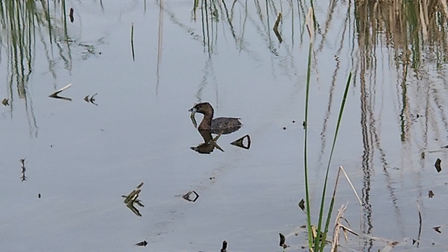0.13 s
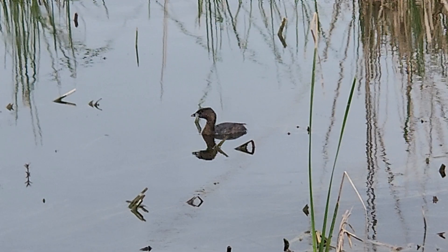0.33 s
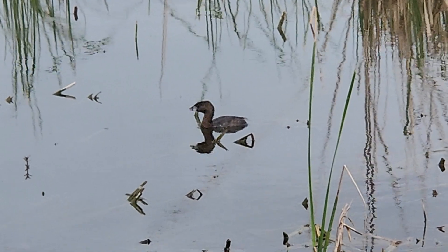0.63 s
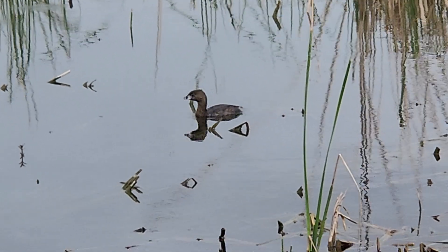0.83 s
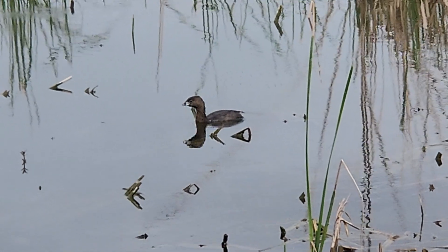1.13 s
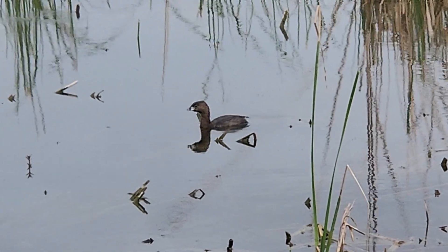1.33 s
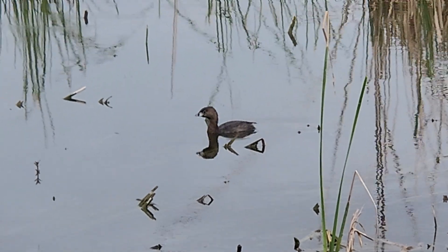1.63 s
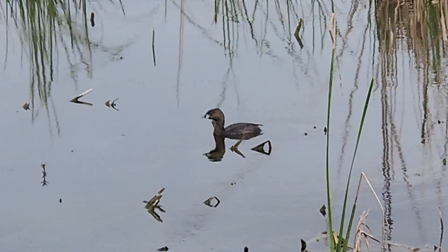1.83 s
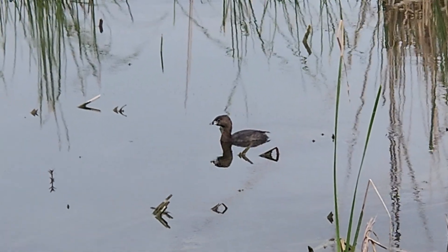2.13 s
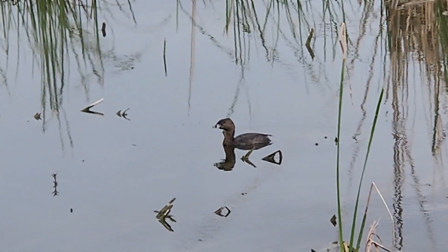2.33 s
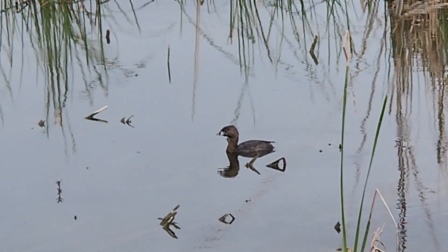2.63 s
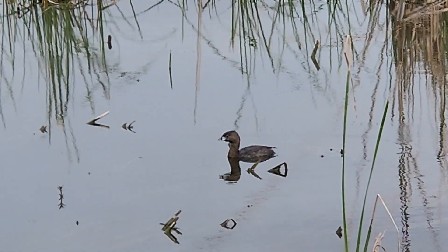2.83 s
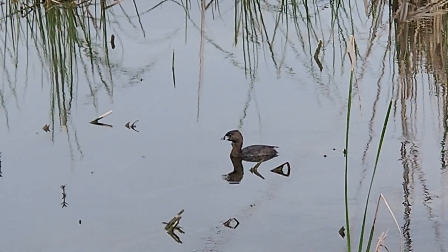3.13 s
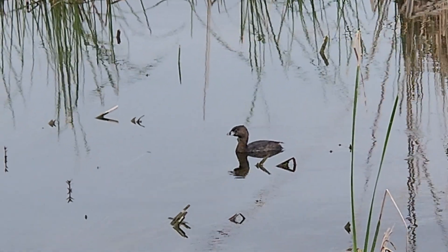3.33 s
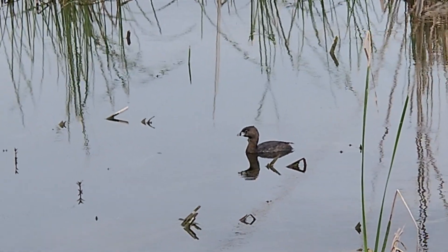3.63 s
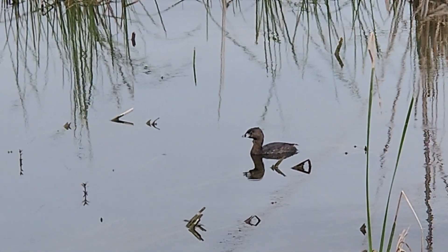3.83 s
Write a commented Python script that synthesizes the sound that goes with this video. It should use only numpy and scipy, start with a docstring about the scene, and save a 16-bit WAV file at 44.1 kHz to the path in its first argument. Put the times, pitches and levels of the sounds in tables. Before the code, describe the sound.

Faint, distant birds chirp over a calm lake's soft hush and uneven low rumble. After a tiny silence, wind buffets the microphone, strongest left, until about 0.3 s, fading by 0.6. A rough nasal waterbird call cracks upward and falls at 0.6-0.75. Repeated thin notes follow from 1.1 to 1.8, quick twittering at 2.1-2.9, a dry clicking rattle at 2.9-3.05, then sparse chirps and a wind thump near 3.7.

```python
"""A calm, reedy lake. Small birds chirp far off, a waterbird gives one nasal, falling call, and reeds rattle dryly.
Wind buffets the microphone at the start and near the end, over a low rumble and a soft outdoor hush.
Wind, rumble, hush, faint bands of hiss and knocks are filtered noise; eddies are short swings of pressure.
The birds are gliding sine tones, the waterbird's with harmonics and hissing air. The rattle is a train
of ringing clicks with crackle. Birds and rattle also get a short, scattered echo tail."""
import sys
import numpy as np
from scipy import signal
from scipy.fft import rfft, irfft
from scipy.io import wavfile
from scipy.ndimage import uniform_filter1d

SR = 44100
rng = np.random.default_rng(int(sys.argv[2]) if len(sys.argv) > 2 else 0)


def transcribe(signal):
    """Save signal, clipped to [-1, 1], as a 16-bit WAV file at the path in sys.argv[1]."""
    frames = np.atleast_2d(signal).T
    limited = np.clip(frames, -1, 1)
    pcm = np.round(limited * 32767).astype(np.int16)
    wavfile.write(sys.argv[1], SR, pcm)


N = 176400
TIME = np.arange(N) / SR  # seconds
FREQ = np.maximum(np.arange(N // 2 + 1) * SR / N, 1)  # Hz
LEFT_RIGHT = np.array([[1], [-1]])  # added to the left, taken from the right


def from_db(db):
    """Turn decibels into a gain."""
    return 10 ** (np.asarray(db) / 20)


def rms_one(x):
    """Scale to an average strength (rms) of 1."""
    return x / np.sqrt(np.mean(x ** 2) + 1e-20)


def in_time(rows):
    """Join a table's points with straight lines; give each column at every sample."""
    times, *columns = np.transpose(rows)
    return [np.interp(TIME, times, column) for column in columns]


def at_hz(points):
    """Read a frequency table at every frequency, evenly spaced in octaves between its points."""
    hz, value = np.transpose(points)
    return np.interp(np.log(FREQ), np.log(np.maximum(hz, 1)), value)


def noise(gain):
    """Random noise with the given gain at each frequency, scaled to rms 1."""
    return rms_one(irfft(rfft(rng.standard_normal(N)) * gain, N))


def bell(hz, octaves):
    """A bell-shaped band of frequencies, with its width in octaves."""
    return np.exp(-0.5 * (np.log2(FREQ / hz) / octaves) ** 2)


def drift(rate_hz):
    """A random wander of rms 1, mostly slower than the given rate."""
    return noise(1 / (1 + (FREQ / rate_hz) ** 2))


def pan(db):
    """Left and right gains, left minus right in dB, that keep the total power constant."""
    return rms_one(from_db(db * LEFT_RIGHT / 2))


def across_lake(x, pan_db, wet_db):
    """The direct sound plus a spread-out tail, scattered by reeds and banks."""
    t60_s, delay_s = 0.59, 0.015  # time for the tail to sink 60 dB; wait before it starts
    t = TIME[:SR]
    tails = rng.standard_normal((2, SR)) * from_db(-60 * t / t60_s) * (t > delay_s)
    wet = np.array([signal.fftconvolve(x, tail / np.linalg.norm(tail))[:N] for tail in tails])
    return pan(pan_db) * (x + from_db(wet_db) * wet)


def wind(curve):
    """Turbulence on one microphone port: stronger gusts shed brighter, lumpier eddies."""
    # colour of a strong gust: (frequency [Hz], level per Hz [dB])
    gust_colour = [(15, -28), (40, -9), (78, 5), (120, -4.5), (170, -8), (255, -7), (330, -25), (500, -33),
                   (700, -33), (1000, -46), (1600, -68.5), (4000, -88.5)]
    strong_db, knee_hz = -16, 189
    dulling = 0.64  # dB lost above the knee for each dB below a strong gust
    eddy_db = 5.5  # random spread of the level above the knee

    level_db, = in_time(curve)
    air = noise(from_db(at_hz(gust_colour)))
    # even out the noise's own swings in strength
    air = air / np.sqrt(uniform_filter1d(air ** 2, size=1500) + 0.056)
    body = irfft(rfft(air) / (1 + (FREQ / knee_hz) ** 4), N)
    weakness_db = np.minimum(level_db - strong_db, 0)
    eddies = (air - body) * from_db(dulling * weakness_db + eddy_db * drift(38))
    return from_db(level_db) * (body + eddies)


def rumble():
    """A low, uneven rumble of noise, nearly alike on both sides."""
    # loudness over time: (time [s], level [dB])
    loudness = [(.07, -37.5), (.6, -61.5), (.73, -55), (.94, -49.5), (.99, -61), (1.25, -53), (1.65, -53.5),
                (1.83, -58), (1.92, -48), (1.99, -61.5), (2.24, -59), (2.31, -46.5), (2.44, -55.5),
                (2.56, -47.5), (2.65, -51), (2.95, -49.5), (3.03, -57.5), (3.3, -63), (4, -78)]
    # colour: (frequency [Hz], level per Hz [dB])
    colour = [(15, -30), (35, -5), (70, 4.5), (110, -6), (160, -7.5), (250, -17.5), (400, -23), (800, -60)]
    side_db = -26  # the part that differs between left and right

    level_db, = in_time(loudness)
    shape = from_db(at_hz(colour))
    middle = noise(shape)
    side = from_db(side_db) * noise(shape) * LEFT_RIGHT
    return from_db(level_db) * (middle + side)


def hush():
    """Distant outdoor noise: mostly shared in the bass, spread out in the treble."""
    # colour: (frequency [Hz], level per Hz [dB])
    colour = [(120, -25.5), (200, -0.5), (263, -9), (298, -6.5), (352, -10.5), (371, -15), (446, -11),
              (554, -20.5), (630, -17.5), (742, -10.5), (827, -15.5), (957, -16.5), (1170, -26.5),
              (1380, -26.5), (1910, -24.5), (2290, -26.5), (2600, -29.5), (3120, -24.5), (3610, -35),
              (4260, -30), (4920, -36), (6240, -33), (8820, -40.5), (9660, -42), (15500, -49.5)]
    # balance: (frequency [Hz], left minus right [dB])
    balance = [(60, -3), (87, -9), (130, -5), (180, 3), (260, 0), (380, -0.5), (550, 4), (790, 1.5),
               (1140, 3), (1650, 2.5), (2380, -6), (3440, -4.5), (4970, -2.5), (7180, -1), (10400, 1.5),
               (15000, 0)]
    # how alike the sides are: (frequency [Hz], likeness [-1 opposite to 1 the same])
    likeness = [(60, 0.79), (700, 0.88), (1300, 0.28), (2400, -0.071), (4400, -0.42), (8000, -.1),
                (15000, 0)]
    level_db, flicker_db, low_cut_hz = -60.5, 0.84, 145

    shape = rms_one(from_db(at_hz(colour)) / np.sqrt(1 + (low_cut_hz / FREQ) ** 4))
    alike = np.clip(at_hz(likeness), -1, 1)
    middle, side = rfft(rng.standard_normal((2, N)))
    both = np.sqrt((1 + alike) / 2) * middle + np.sqrt((1 - alike) / 2) * side * LEFT_RIGHT
    sides = from_db(at_hz(balance) * LEFT_RIGHT / 2)
    # make up for the power that balance and likeness add or take away
    sides = sides / np.sqrt(np.mean(sides ** 2, axis=0) * (1 + alike + 1e-3) / 2)
    return from_db(level_db + flicker_db * drift(7.1)) * irfft(both * shape * sides, N)


def swells():
    """Faint, fluttering bands of noise rise and sink in the distance as hiss."""
    # one hiss per row: (start [s], length [s], centre [Hz], width [octaves], level [dB],
    # left minus right [dB])
    hisses = [(0.53, 0.96, 2267, 0.06, -68.8, -2), (0.4, 1.16, 4180, 0.11, -72.5, -10),
              (0.056, 1.4, 6020, 0.24, -74, -0.5), (3.06, .38, 2330, .14, -67.5, -2.5),
              (3.17, .2, 1000, .6, -65, 1), (3.075, .085, 7800, .17, -70.5, -5),
              (3.23, 0.1, 7800, .2, -74, -4), (3.16, .29, 4140, 0.1, -71.5, -17),
              (2.2, 0.96, 8100, 0.18, -83, 0), (1.7, 1.3, 2920, 0.16, -76, -4)]
    flutter_db, flutter_hz = 1.6, 70

    out = 0
    for start, length, hz, octaves, level_db, pan_db in hisses:
        progress = np.clip((TIME - start) / length, 0, 1)
        arch = np.sqrt(np.abs(np.sin(np.pi * progress)))
        flutter = rms_one(from_db(flutter_db * drift(flutter_hz)))
        band = bell(hz, octaves)
        hiss = np.array([noise(band), noise(band)])
        out = out + from_db(level_db) * pan(pan_db) * arch * flutter * hiss
    return out


def buffets():
    """Single eddies thump a microphone port, each a short, peaked swing of pressure."""
    # one eddy per row: (time [s], swing [Hz], level [dB], left minus right [dB])
    thumps = [(0.0946, 200, -14, 22), (.129, 90, -14, 17), (.155, 78, -14, 11), (0.194, 205, -13, 33),
              (.212, 330, -27, 26), (.229, 75, -18, 2), (.25, 75, -21.5, 3.5), (0.368, 63.3, -29, -1),
              (.737, 75.5, -40, 11), (3.419, 80, -39, -28), (3.54, 109, -33, 0), (3.617, 69.5, -36, -20),
              (3.7155, 200, -25, -13), (3.727, 72, -23.5, -12)]
    width_cycles = 0.28

    out = 0
    for time, hz, level_db, pan_db in thumps:
        cycles = (TIME - time) * hz
        pulse = 1 / np.cosh(np.clip(cycles / width_cycles, -20, 20))
        swing = np.cos(2 * np.pi * (cycles + rng.random())) * pulse
        out = out + pan(pan_db) * from_db(level_db) * swing
    return out


def knocks():
    """Faint knocks and rustles: short bursts of noise that die quickly."""
    # one burst per row: (time [s], centre [Hz], time to sink 30 dB [s], starting level [dB],
    # left minus right [dB])
    bursts = [(0.095, 2300, 0.027, -59.5, -8), (.28, 2150, 0.06, -61, -11), (.615, 10500, .014, -63, 8),
              (3.052, 2450, .04, -56, -4), (3.33, 430, 0.036, -46.5, 13), (3.655, 387, 0.034, -47.5, 24),
              (3.945, 506, .04, -52, 18)]

    out = 0
    for time, hz, fade_s, level_db, pan_db in bursts:
        age = np.maximum(TIME - time, 0)
        attack = 1 - np.exp(-age / 0.002)
        fade = from_db(level_db - 30 * age / fade_s)
        out = out + pan(pan_db) * fade * attack * noise(bell(hz, 0.45))
    return out


def small_birds():
    """Short whistled glides, made of sine tones that each swell and fade once."""
    # chirps: (start [s], length [s], first pitch [Hz], middle pitch [Hz], last pitch [Hz], level [dB])
    chirps = [(0.153, 0.08, 4050, 3930, 3710, -71.5), (0.358, 0.068, 3150, 3400, 3270, -74),
              (0.342, 0.061, 2070, 2113, 2080, -72.5), (0.856, 0.05, 3080, 3330, 3320, -71),
              (0.899, 0.048, 2130, 2080, 2050, -68), (1.395, 0.073, 3200, 3170, 3060, -77),
              (1.6, .05, 2550, 2470, 2400, -75.5), (1.658, 0.07, 2030, 2050, 2100, -73),
              (1.712, .04, 3200, 3720, 3800, -76.5), (1.47, .06, 3070, 3030, 3080, -77),
              (2.112, 0.022, 3500, 3250, 3050, -74), (2.163, .04, 2230, 2355, 2540, -72),
              (2.214, 0.058, 2580, 2860, 3400, -73), (2.27, 0.026, 3600, 4200, 5200, -77),
              (2.43, 0.044, 2240, 2370, 2520, -79), (2.488, .02, 2500, 2900, 3400, -64),
              (2.527, 0.031, 2050, 2210, 2130, -69.5), (2.582, 0.024, 2610, 2980, 3500, -67),
              (2.626, 0.02, 2600, 2360, 2230, -67), (2.712, 0.023, 2230, 2370, 2300, -68),
              (2.846, 0.022, 2850, 3130, 3000, -69), (2.876, 0.026, 2000, 2070, 2120, -74),
              (3.307, 0.042, 2950, 2930, 2860, -70), (3.414, 0.1, 2850, 2740, 2620, -77),
              (3.94, .013, 4520, 3700, 3300, -69.5)]
    # one bird's repeated note that holds, then drops: (start [s], level [dB])
    slurs = [(1.126, -69), (1.328, -66), (1.529, -67), (1.742, -67.5), (3.675, -71), (3.875, -75)]
    slur_s, slur_hz, slur_drop_hz, slur_bend = 0.049, 3240, 740, 3.85
    # tiny notes of random pitch and slope that link the song's chirps
    twitter_from_s, twitter_to_s, twitter_note_s = 2.05, 2.85, 0.016
    twitter_low_hz, twitter_high_hz, twitter_glide_oct, twitter_db = 2100, 4000, 0.15, -77
    fullness = 0.54  # below 1, a note stays near its peak for longer
    waver = 1 + 0.007 * drift(150)

    notes = []  # (start, pitch at each sample, level)
    for start, length, first, middle, last, level_db in chirps:
        progress = np.linspace(0, 1, int(length * SR))
        curve = np.polyfit([0, 0.5, 1], [first, middle, last], 2)
        notes.append((start, np.polyval(curve, progress), level_db))

    progress = np.linspace(0, 1, int(slur_s * SR))
    slur_pitch = slur_hz - slur_drop_hz * progress ** slur_bend
    notes += [(start, slur_pitch, level_db) for start, level_db in slurs]

    progress = np.linspace(-0.5, 0.5, int(twitter_note_s * SR))
    for when, height, slope in rng.random(size=(14, 3)):
        start = twitter_from_s + when * (twitter_to_s - twitter_from_s)
        centre_hz = twitter_low_hz * (twitter_high_hz / twitter_low_hz) ** height
        glide = 2 ** (twitter_glide_oct * (2 * slope - 1) * progress)
        notes.append((start, centre_hz * glide, twitter_db))

    out = np.zeros(N + SR)  # spare room for notes that run past the end
    for start, hz, level_db in notes:
        at = int(start * SR) + np.arange(len(hz))
        swell = np.abs(np.sin(np.linspace(0, np.pi, len(hz)))) ** fullness
        phase = 2 * np.pi * np.cumsum(hz * waver[at % N]) / SR
        out[at] += from_db(level_db) * np.sqrt(2) * swell * np.sin(phase)
    return across_lake(out[:N], pan_db=-4, wet_db=-6)


def register(curve, harmonics, air_db):
    """One register of the voice: wavering harmonics of shifting balance, and air let through each cycle."""
    # colour of the air rushing with the voice: (frequency [Hz], level per Hz [dB])
    air_colour = [(600, -8), (1200, 0), (2400, 0), (4000, -2), (5500, -12), (10000, -10), (15000, -14)]
    jitter, rasp = 0.004, 0.26  # random spread of pitch and of each harmonic's strength, as fractions

    hz, level_db = in_time(curve)
    start, end = curve[0][0], curve[-1][0]
    phase = 2 * np.pi * np.cumsum(hz * (1 + jitter * drift(150))) / SR
    air = noise(from_db(at_hz(air_colour))) * (1 + np.cos(phase))
    voice = from_db(air_db) * rms_one(air)
    for number, levels_db in enumerate(harmonics, 1):
        strength = np.sqrt(2) * from_db(np.interp(TIME, (start, end), levels_db))
        roughness = 1 + rasp * drift(270)
        voice = voice + strength * np.sin(number * phase) * roughness
    return voice * from_db(level_db) * (TIME > start) * (TIME < end)


def waterbird():
    """A rough nasal note cracks up into a higher register and sinks; the bank returns one dull echo."""
    # low opening register, then high falling one: (time [s], pitch [Hz], level [dB])
    opening_curve = [(.612, 471, -80), (.629, 495, -74), (.636, 498, -59.5), (.652, 515, -57),
                     (.667, 520, -59), (.678, 516, -70)]
    fall_curve = [(.668, 965, -63), (.676, 915, -56), (.684, 868, -54), (.702, 776, -55), (.724, 748, -54),
                  (.742, 735, -56), (.751, 722, -67)]
    # their harmonics, from the first up: (level at start [dB], level at end [dB])
    opening_harmonics = [(-22, -22), (-1, -2), (-2, 1), (-16, -1), (-22, -17), (3, -2), (3, -3), (-11, -22),
                         (-12, -26)]
    fall_harmonics = [(0, 0), (-5, -13), (-12, -20), (-11, -32), (-21, -11)]
    echo_s, echo_db, echo_cutoff_hz = 0.021, -13, 3500

    opening = register(opening_curve, opening_harmonics, air_db=-13)
    fall = register(fall_curve, fall_harmonics, air_db=-22)
    voice = opening + fall
    delayed = np.interp(TIME - echo_s, TIME, voice)
    echo = signal.sosfilt(signal.butter(2, echo_cutoff_hz, fs=SR, output="sos"), delayed)
    return across_lake(voice + from_db(echo_db) * echo, pan_db=2.5, wet_db=-9.5)


def rattle():
    """Fast, even clicks in the reeds ring short resonances, then lose their beat amid bright crackle."""
    # loudness of the clicks: (time [s], level [dB])
    click_level = [(2.908, -42), (2.93, -37.5), (2.982, -35.5), (3.005, -40), (3.04, -47)]
    # resonances: (frequency [Hz], level [dB], time to sink 60 dB [s])
    modes = [(1760, -16, 0.008), (2360, -1, 0.014), (2490, 0, 0.01)]
    # loudness of the crackle: (time [s], level [dB])
    crackle_level = [(2.89, -110), (2.92, -77), (2.965, -74), (2.985, -64), (3.05, -68), (3.12, -85)]
    start_s, clicks_per_s, attack_s, pan_db = 2.9103, 118, 0.0015, -3
    break_s, jitter_s, scatter_s = 2.992, 0.0001, 0.002  # timing spread is wider after the break
    beat_db, grain_db = 2.5, 2  # the crackle's regular pulsing and its random graininess

    level_db, = in_time(click_level)
    times = start_s + np.arange(16) / clicks_per_s
    spread = np.where(times > break_s, scatter_s, jitter_s)
    times = times + rng.normal(0, 1, len(times)) * spread
    at = (times * SR).astype(int)
    t = TIME[:SR // 10]
    attack = (1 - np.exp(-t / attack_s)) ** 2
    ringing = 0
    for hz, mode_db, t60_s in modes:
        clicks = np.zeros(N)
        clicks[at] = from_db(level_db[at] + mode_db + rng.normal(0, 1, len(at)))
        ring = np.sin(2 * np.pi * hz * t) * from_db(-60 * t / t60_s) * attack
        ringing = ringing + signal.fftconvolve(clicks, ring)[:N]

    pulsing = np.cos(2 * np.pi * clicks_per_s * (TIME - start_s - attack_s))
    beat = from_db(beat_db * pulsing + grain_db * drift(400))
    hiss = noise(bell(2800, octaves=0.95))
    crackle_db, = in_time(crackle_level)
    crackle = from_db(crackle_db) * rms_one(beat * hiss)
    return across_lake(ringing, pan_db, wet_db=-17) + across_lake(crackle, pan_db, wet_db=-5)


def scene():
    """Birds and a rattle over the lake's background, with wind on the microphone."""
    # wind on each microphone port: (time [s], level [dB])
    wind_left = [(.07, -23), (.095, -18.5), (.195, -21), (.255, -26), (.278, -42), (.37, -46), (.44, -54),
                 (.48, -62), (3.68, -79), (3.725, -31), (3.79, -61)]
    wind_right = [(.07, -42), (.15, -32.5), (.24, -29), (.3, -43.5), (.47, -42.5), (.57, -39.5),
                  (.64, -61.5), (3.28, -57.5), (3.42, -48.5), (3.54, -45), (3.67, -46), (3.718, -32),
                  (3.755, -38.5), (3.88, -56), (3.94, -44), (4, -45)]

    gusts = np.array([wind(wind_left), wind(wind_right)]) + buffets()
    background = rumble() + hush() + swells() + knocks()
    return gusts + background + small_birds() + waterbird() + rattle()


def record(dry):
    """The sound opens after a moment of silence; a steep filter cuts the highest treble."""
    start_s, opening_s, cutoff_hz = 0.068, 0.003, 15800
    opened = np.clip((TIME - start_s) / opening_s, 0, 1)
    top_cut = signal.ellip(10, 0.1, 80, cutoff_hz, fs=SR, output="sos")
    return signal.sosfilt(top_cut, dry * opened)


dry = scene()
out = record(dry)
transcribe(out)
```